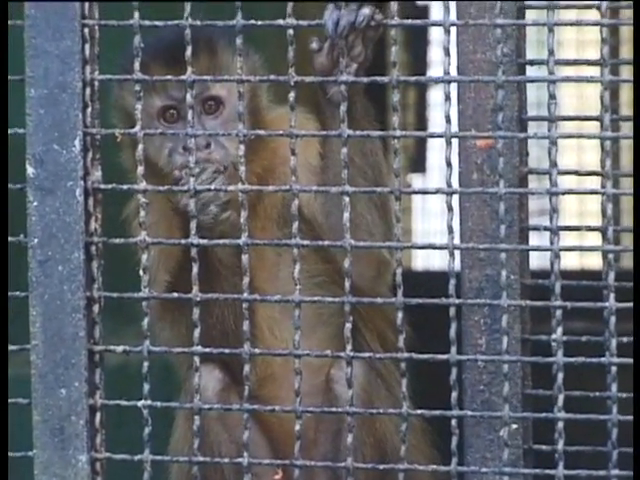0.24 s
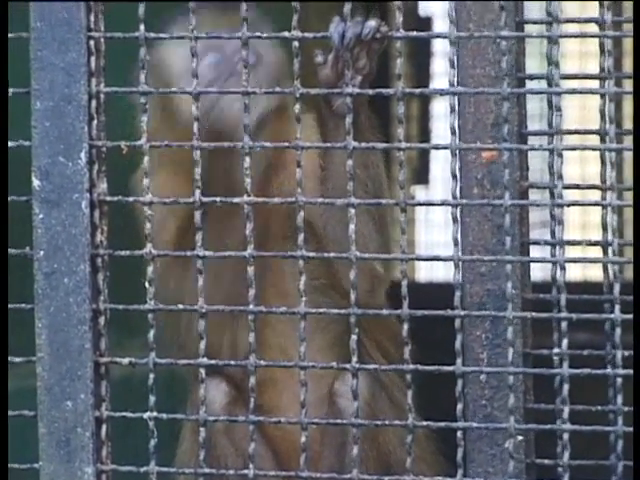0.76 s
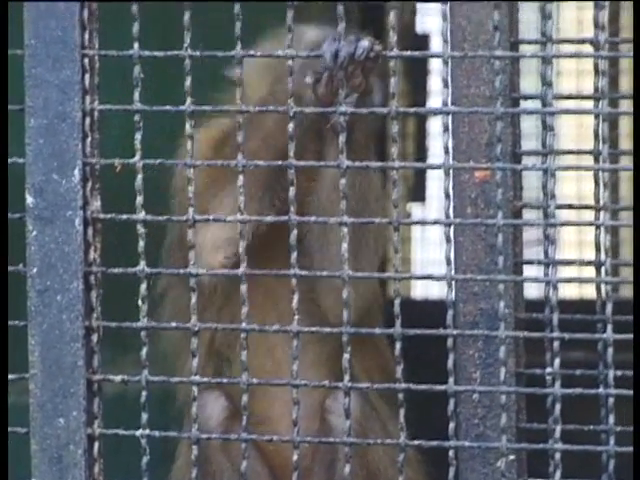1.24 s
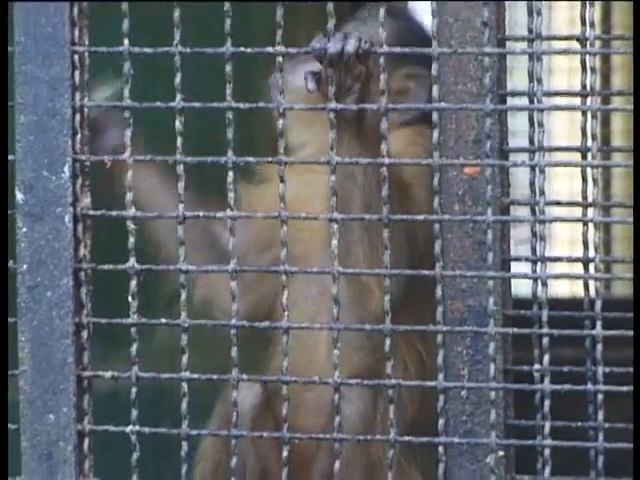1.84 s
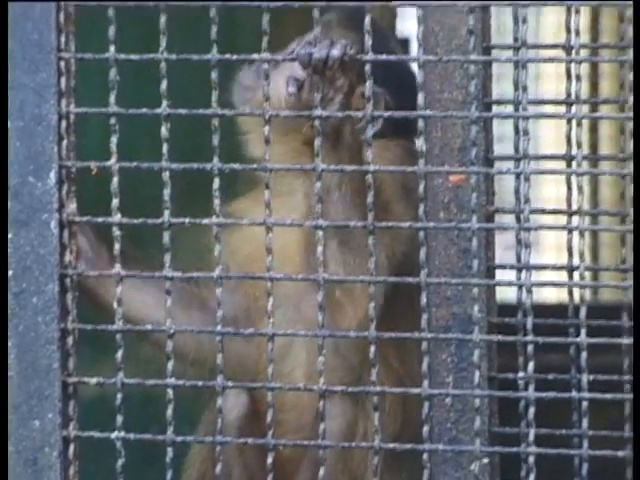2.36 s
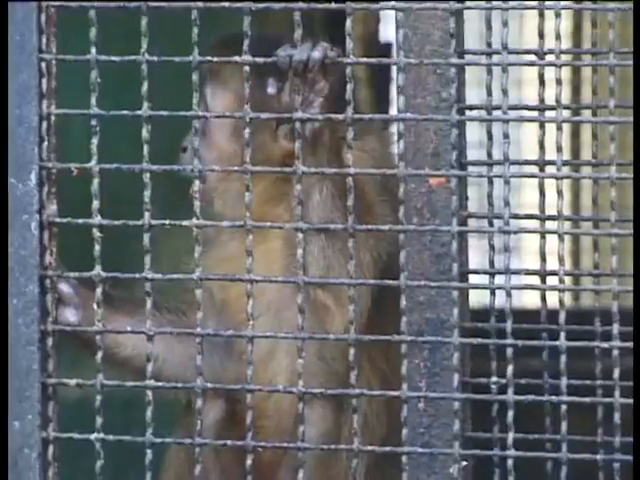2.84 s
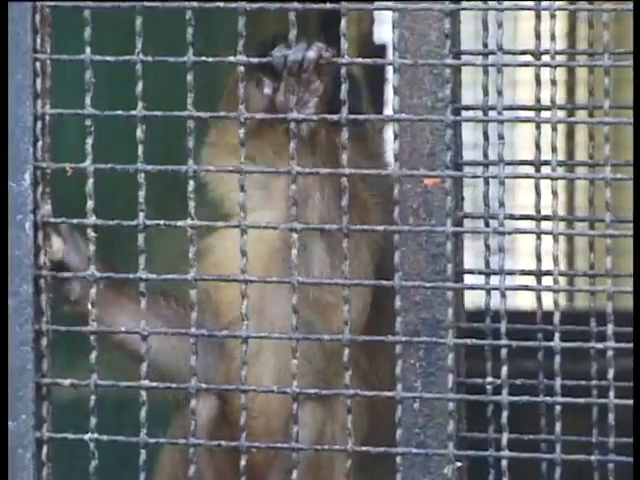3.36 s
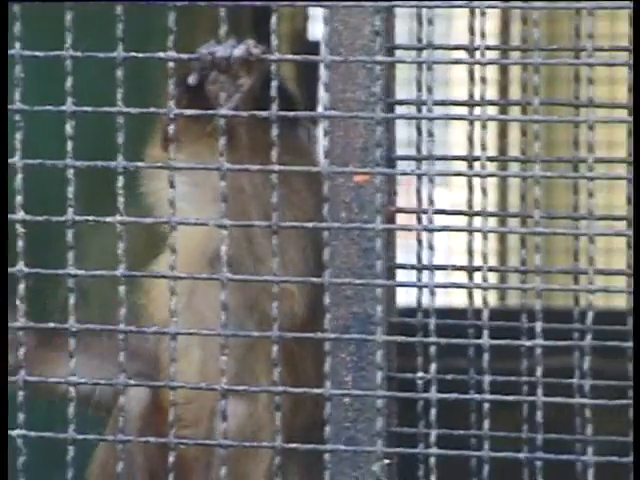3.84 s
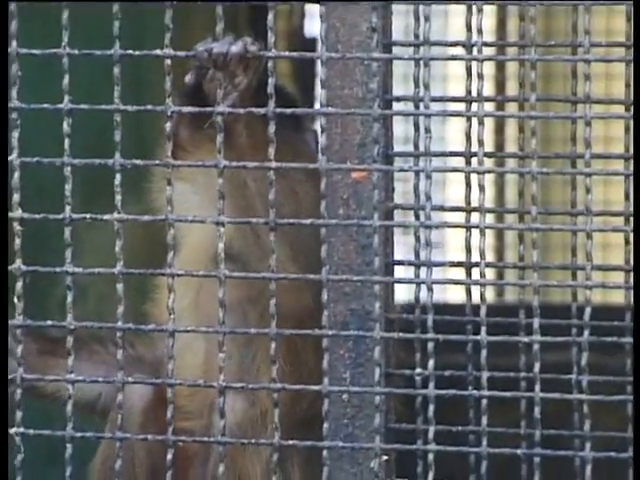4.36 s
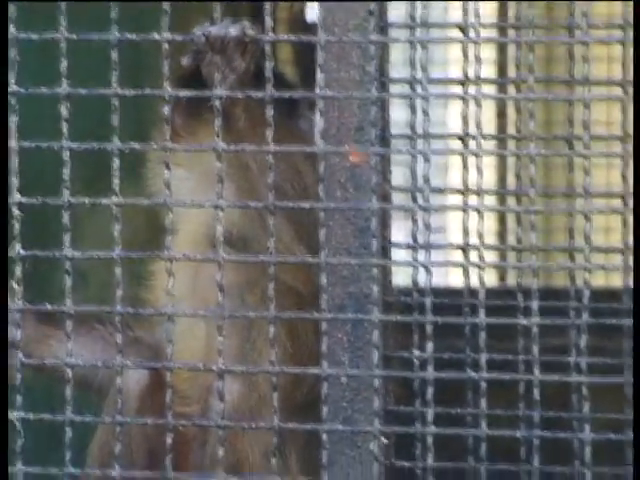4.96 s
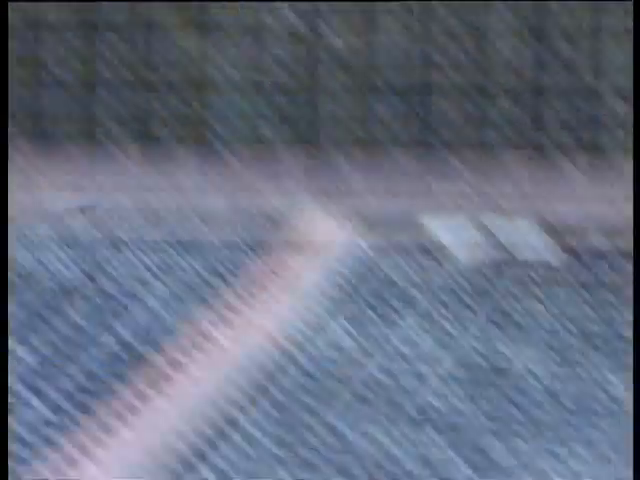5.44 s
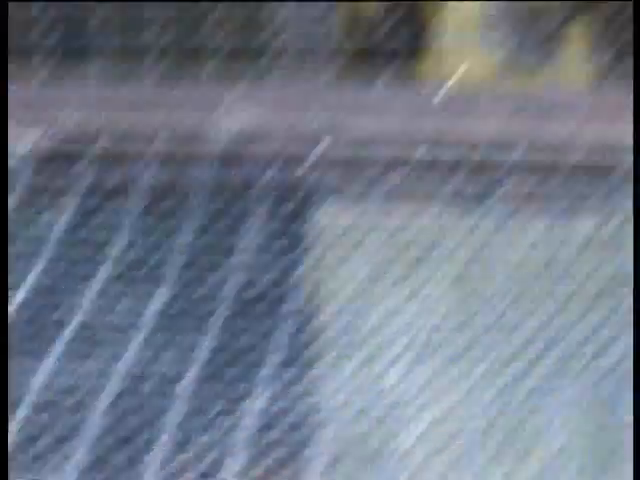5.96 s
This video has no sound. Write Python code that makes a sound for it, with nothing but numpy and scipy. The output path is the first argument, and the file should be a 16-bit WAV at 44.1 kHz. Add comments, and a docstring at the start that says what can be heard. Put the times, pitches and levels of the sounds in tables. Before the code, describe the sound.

Outdoors by a cage, a steady low traffic rumble lies under a soft hiss of leaves. Close by, slightly to the right, a monkey gives a string of short piercing whistles ending in a held note. Two grunts and a tiny bird chirp follow, then a longer, louder trill climbs and wavers, ending in a quick downward slide. Faint squeaks, rustles and grunts close it. A close stereo microphone catches a short hard echo after each call.

```python
"""Distant traffic rumbles under a soft hiss of leaves; then a caged monkey whistles trills, built of gliding
tones, with one long held note and a downward slide that ends the last long phrase. Monkeys nearby grunt and hoot
in harmonic tones, noise bursts make rustles and a low thump, and a far bird chirps in sine glides. The cage walls
answer every call with a noise tail. Two close microphone ports hear the callers from the right."""
import sys
import numpy as np
from scipy import signal
from scipy.fft import rfft, irfft, next_fast_len
from scipy.io import wavfile
from scipy.ndimage import uniform_filter1d, map_coordinates

SR = 44100
rng = np.random.default_rng(int(sys.argv[2]) if len(sys.argv) > 2 else 0)


def rack_gain(trim_db):
    """Turn a fader trim in dB into the linear factor to multiply a signal by."""
    fader = np.asarray(trim_db, float)
    return 10 ** (fader / 20)


def to_wav(s):
    """Save 16-bit WAV."""
    ch = np.atleast_2d(s).T  # columns
    pcm = np.round(np.clip(ch, -1, 1) * 32767)  # PCM
    wavfile.write(sys.argv[1], SR, pcm.astype(np.int16))


N = 273197


def unit(x):
    """Scaled to rms 1."""
    return x / np.sqrt(np.mean(x ** 2) + 1e-20)


def along(points, hz, count=1):
    """Column count of (frequency [Hz], value, ..) points, read on a log frequency axis."""
    p = np.transpose(points)
    return np.interp(np.log(hz + 1), np.log(p[0] + 1), p[count])


def wobble(rate):
    """A smooth random curve, rate knots a second."""
    return map_coordinates(rng.standard_normal(int(N * rate / SR) + 4), [np.arange(N) * rate / SR])


def filtered(x, response):
    """x passed through a complex response of frequency."""
    m = next_fast_len(x.shape[-1] + 8192)
    return irfft(rfft(x, m) * response(np.fft.rfftfreq(m, 1 / SR)), m)[..., :x.shape[-1]]


def add(track, s, sound):
    """Mix a sound into a track at time s, in seconds."""
    part = track[..., round(s * SR):][..., :sound.shape[-1]]
    part += sound[..., :part.shape[-1]]


def rush(spectrum, patchy_db, size=N):
    """Stereo noise of rms 1 with patches of random gain in time and frequency."""
    # how alike diffuse sound is at the two ports: (frequency [Hz], left-right correlation [-1 to 1])
    alike = [(40, 0.98), (100, 0.78), (300, 0.55), (1000, 0.69), (3000, 0.37), (8000, 0.034),
             (14000, 0.093)]
    z = signal.stft(rng.standard_normal((2, size)), nperseg=512)[2]
    field = uniform_filter1d(rng.standard_normal(z.shape[1:]), size=5, axis=0)
    field = uniform_filter1d(field, size=8, axis=1)
    pair = signal.istft(z * rack_gain(patchy_db * unit(field)), nperseg=512)[1][:, :size]

    def shares(hz):
        angle = np.arccos(np.clip(along(alike, hz), -1, 1)) / 2
        return spectrum(hz) * [np.cos(angle), np.sin(angle)]

    mid, side = filtered(pair, shares)
    return unit(np.array([mid + side, mid - side]))


def background():
    """Far traffic, a deep drone and a lumpier rumble of shaped noise, under a soft noise hiss of leaves."""
    # distant traffic: (time [s], drone level [dB], rumble level [dB])
    traffic = [(0, -36, -42), (.12, -33, -37), (.6, -33.5, -39), (.9, -37, -40), (1.4, -32, -36),
               (2, -33, -36.5), (2.3, -39, -37), (2.75, -35.5, -35.5), (3.15, -39.5, -37.5),
               (3.6, -32.5, -36), (3.97, -34, -37.5), (4.3, -39, -41), (4.7, -38, -42), (4.83, -44.5, -46),
               (5.05, -37, -39.5), (5.3, -37, -34.5), (5.9, -34, -37), (6.19, -38, -35.5)]
    # traffic spectrum: (frequency [Hz], relative level [dB per Hz])
    rumble_spectrum = [(13, -41), (22, -2), (119, -5), (225, -15), (257, -18), (336, -22.5), (372, -24),
                       (503, -30), (777, -38.5), (1200, -43.5), (1560, -64.5), (2640, -120)]
    # the rumble thumps or drops away for a moment: (time [s], change [dB], half length [s])
    lumps = [(0.276, -6, 0.036), (0.432, 5.5, .02), (0.577, 4.5, .02), (0.823, 13, 0.0083),
             (1.209, 11.5, 0.0067), (1.541, -13.5, 0.021), (2.155, -3.5, 0.037), (2.278, 7.5, 0.039),
             (3.03, -5.5, 0.039), (3.732, 5.5, 0.017), (3.84, -6.5, 0.054), (3.958, 7, .025),
             (4.105, 5.5, 0.018), (4.456, 8, 0.027), (5.16, -0.5, 0.014), (5.553, 5, .025),
             (5.662, -11.5, 0.013), (5.787, 6.5, 0.0067), (6.07, 7, 0.02)]
    # leaves: (time [s], hiss level [dB])
    leaves = [(0, -45), (1.1, -45.5), (1.4, -48), (2.2, -47), (3, -48), (3.45, -46.5), (4.1, -51.5),
              (5.6, -51), (6.19, -55.5)]
    # leaf spectrum: (frequency [Hz], relative level [dB per Hz])
    hiss_spectrum = [(290, -41), (500, -8), (780, -11.5), (875, -11.5), (2430, -12.5), (2680, -11),
                     (3620, -10), (3840, -13), (5740, -11.5), (13200, -28.5), (15400, -40)]
    s, drone_db, rumble_db = np.transpose(traffic)
    t = np.arange(N) / SR
    lumps_db = sum(db * np.exp(-((t - at) / half) ** 2) for at, db, half in lumps)

    def upper(hz):  # power share of the rumble above about 95 Hz; the drone has the rest
        return 1 / (1 + (95 / (hz + 1)) ** 4)

    def drone_shape(hz):
        return rack_gain(along(rumble_spectrum, hz)) * np.sqrt(1 - upper(hz)) / (1 + (33 / (hz + 1)) ** 4)

    drone = rush(drone_shape, patchy_db=0.9)
    rumble = rush(lambda hz: rack_gain(along(rumble_spectrum, hz)) * np.sqrt(upper(hz)), patchy_db=2.5)
    rumble = unit(rumble * rack_gain(1.37 * wobble(12)))
    low = rack_gain(np.interp(t, s, rumble_db) + lumps_db) * rumble
    low = low + rack_gain(np.interp(t, s, drone_db) + 0.94 * lumps_db) * drone
    # the hiss takes along a share of each drop
    hiss_db = np.interp(t, *np.transpose(leaves)) + 0.39 * np.minimum(lumps_db, 0) + 0.82 * wobble(16)
    return low + rack_gain(hiss_db) * rush(lambda hz: rack_gain(along(hiss_spectrum, hz)), patchy_db=0.56)


def voice(t, length, hz, partials_db, hook, sag, close, rough=0):
    """A voiced note: vocal folds bend the pitch as they start (hook) and slacken as they close (sag)."""
    left = length - t
    bend = 1 + hook * np.exp(-t / 0.002) - sag * np.exp(np.minimum(-left, 0.004) / close)
    # rough notes lose their regular cycle as they go on: timing wanders and each partial breaks up
    knots = rng.standard_normal((len(partials_db) + 1, 128))
    growth = rough * np.clip(t / length, 0, 1)
    scatter = [growth * map_coordinates(row, [t * 230]) for row in knots]
    phase = 2 * np.pi * np.cumsum(hz * bend) / SR + 0.55 * scatter[-1]
    opening = np.clip(t / 0.0014, 0, 1)
    closing = np.clip(1 + left / 0.005, 0, 1) ** 1.62
    partials = sum(rack_gain(db + 9.8 * scatter[k]) * np.sin((k + 1) * phase)
                   for k, db in enumerate(partials_db))
    return np.sqrt(2) * opening * closing * partials


def room(x, wet_db):
    """Direct sound plus the cage walls' noise tail, each frequency dying at its own speed."""
    # decay between the walls: (frequency [Hz], time to fall 60 dB [s])
    walls = [(500, 0.36), (3000, 0.39), (7000, 0.32), (12000, 0.28)]
    hz, t, z = signal.stft(rng.standard_normal((2, SR // 2)), SR, nperseg=256)
    tail = signal.istft(z * rack_gain(-60 * t / along(walls, hz)[:, None]), SR, nperseg=256)[1]
    onset = np.clip(np.arange(tail.shape[1]) / SR / 0.0011, 0, 1)
    tail = tail * onset + 0.25 * tail[0]  # the left tail is partly shared by both sides
    wet = rack_gain(wet_db) * signal.fftconvolve(x[None], tail / np.linalg.norm(tail[0]), axes=1)
    wet[:, :len(x)] += x
    return wet


def whistle_overtones(hz, octave_db):
    """Partial levels of a nearly pure tone: the purer the octave, the fainter the twelfth."""
    # how well the mouth passes the whistle's twelfth: (frequency [Hz], gain [dB])
    twelfth = [(8000, -24), (9000, -32), (9800, -11), (10500, -21), (11500, -21), (13000, -30)]
    return [0 * octave_db, octave_db, 1.3 * octave_db + along(twelfth, 3 * hz)]


def whistle(curve, hook, wet_db):
    """A whistle steered along its pitch, level and overtone curve, with the walls' answer."""
    s, *cols = np.transpose(curve)
    t = np.arange(round((s[-1] - s[0]) * SR)) / SR
    hz, db, octave_db = [np.interp(t + s[0], s, c) for c in cols]
    overtones_db = whistle_overtones(hz, octave_db)
    tone = voice(t, t[-1] - 0.005, hz, overtones_db, hook, sag=0.01, close=0.0014, rough=0.076)
    return room(rack_gain(db) * tone, wet_db)


def monkey():
    """Trills of short whistles, each leaning toward the next, a held whistle and a downward slide."""
    # trill notes: (time [s], length [s], middle pitch [Hz], level [dB], octave overtone once settled [dB])
    trill = [(.405, .028, 2797, -36.5, 6), (0.48, 0.0148, 3030, -34.5, 7), (.553, 0.0188, 3090, -29.5, 5),
             (0.63, 0.0188, 3140, -31, -1), (0.702, .025, 3192, -31, -1.5), (.836, .035, 3328, -39, -1),
             (0.883, 0.017, 3274, -41, -0.5), (.934, .029, 3316, -30.5, -6),
             (1.001, .027, 3322, -25.5, -10), (1.068, .028, 3320, -24.5, -8.5),
             (1.138, .026, 3340, -25, -10), (1.19, 0.03, 3353, -27, -10), (2.08, 0.0302, 2958, -37, 3.3),
             (2.161, 0.0163, 3135, -31.5, 5), (2.237, .017, 3240, -29, 1), (2.308, .023, 3325, -28.5, -2.9),
             (2.384, 0.024, 3347, -27, -4), (2.461, 0.0262, 3387, -28.5, -2.5),
             (2.54, 0.0197, 3425, -22, -7.5), (2.615, 0.0189, 3510, -20.5, -9.5),
             (2.686, 0.019, 3494, -20, -10.5), (2.758, .017, 3594, -18.5, -13.5),
             (2.831, 0.013, 3645, -20, -18.5), (2.902, 0.0184, 3825, -23.5, -19),
             (2.976, .018, 3597, -21.5, -19), (3.053, 0.021, 3338, -33.5, -17),
             (3.184, 0.054, 3334, -29.5, -13.5), (3.275, 0.017, 3690, -21.5, -25),
             (3.362, 0.0134, 4130, -22.5, -24), (3.44, 0.019, 4164, -22.5, -22),
             (3.517, 0.018, 4040, -20.5, -24.5), (3.601, 0.0096, 3670, -22, -21),
             (3.767, .047, 3400, -29, -7), (3.856, .016, 3635, -19.5, -14.5),
             (3.935, .016, 3896, -18.5, -23), (4.015, 0.014, 3967, -21.5, -32),
             (4.109, 0.013, 3310, -41.5, -13), (4.503, 0.016, 4198, -28.5, -3.5),
             (4.598, 0.018, 4326, -27.5, -2.5), (4.677, 0.019, 4260, -22, -9.5),
             (4.769, .011, 4094, -23, -6.5), (4.853, 0.012, 4145, -22, -5.5),
             (5.285, 0.015, 3203, -34.5, -2)]
    # the held note: (time [s], pitch [Hz], level [dB], octave overtone [dB])
    held = [(1.25, 3460, -36, -21), (1.262, 3335, -31.5, -8), (1.295, 3331, -23, -15.5),
            (1.43, 3358, -28.5, -16), (1.484, 3343, -21.5, -16.5), (1.514, 3338, -30, -12),
            (1.562, 3328, -27, -15), (1.599, 3304, -37.5, -18), (1.642, 3150, -42, -11)]
    # the downward slide that ends the last long phrase:
    # (time [s], pitch [Hz], level [dB], octave overtone [dB])
    slide = [(4.939, 3780, -26, -13), (4.952, 3516, -34, -6.5), (4.968, 3010, -46.5, -7)]
    phrase_gap_s, long_s = 0.15, 0.038
    lean = 0.26  # share of the step to the phrase's next note that a note already glides
    long_rise_hz = 50  # long notes climb this much more
    swell_db_per_s = 68  # breath pressure builds through a note
    overtone_lag_s = 0.0021  # the overtones join once the note has settled
    out = np.zeros((2, N))
    starts, pitches = np.transpose(trill)[[0, 2]]
    steps = np.append(np.diff(pitches) * (np.diff(starts) < phrase_gap_s), 0)
    for (s, length, mid_hz, db, octave_db), step in zip(trill, steps):
        t = np.arange(round((length + 0.005) * SR)) / SR
        short = length < long_s
        glide_hz = lean * step + long_rise_hz * (not short)
        hz = mid_hz + glide_hz * (t / length - 0.5)
        swell = rack_gain(db + swell_db_per_s * (t - length / 2))
        swell = swell * np.clip(short + t / 0.014, 0, 1)  # long notes open softly
        # long, faint, lowest and top notes start level
        hook = 0.1 * short * np.interp(mid_hz, [3000, 3100, 3690, 4020], [0, 1, 1, 0])
        hook = hook * np.clip((db + 41) / 7, 0, 1)
        sag = 0.02 * short * np.clip((db + 44.5) / 12, 0, 1)
        overtones_db = whistle_overtones(hz, octave_db - 12 * np.exp(-t / overtone_lag_s))
        note = voice(t, length, hz, overtones_db, hook, sag, close=0.0026, rough=0.12)
        add(out, s, room(swell * note, wet_db=-6.5))
    add(out, held[0][0], whistle(held, hook=0.054, wet_db=-7.5))
    add(out, slide[0][0], whistle(slide, hook=0.05, wet_db=-7.0))
    return out


def rustles():
    """Rustles, a low thump and a faint narrow 1.3 kHz breath: uneven noise bursts around a centre frequency."""
    # bursts: (time [s], rise [s], fall [s], level [dB], centre [Hz], width [octaves])
    bursts = [(0.771, 0.011, 0.021, -37, 3500, 0.84), (2.3, 0.029, 0.069, -58, 3000, 1.1),
              (2.8, .06, .08, -52, 1770, 0.84), (3.359, .05, 0.34, -45, 6300, 0.4),
              (3.859, 0.048, 0.12, -46, 6000, 0.42), (3.95, 0.014, 0.025, -29, 197, 0.6),
              (5.313, 0.0088, 0.024, -39, 3120, 0.82), (5.312, 0.06, 0.11, -54.5, 1280, 0.098),
              (5.54, .04, 0.074, -47.5, 7000, 0.41), (5.668, 0.0035, 0.0057, -46.5, 2500, 0.92),
              (6.129, 0.0081, 0.026, -48.5, 1980, 0.95), (6.16, 0.027, .05, -52, 6000, 0.46)]
    out = np.zeros((2, N))
    for s, rise, fall, db, centre_hz, octaves in bursts:
        t = np.arange(round((2 * rise + 4 * fall) * SR) + 600) / SR - 2 * rise
        shape = np.where(t < 0, np.exp(-(t / rise) ** 2), np.exp(-t / fall))
        band = lambda hz: np.exp(-0.5 * (np.log2((hz + 1) / centre_hz) / octaves) ** 2)
        add(out, s - 2 * rise, rack_gain(db) * shape * rush(band, patchy_db=3.5, size=len(t)))
    return out


def grunts():
    """Harmonic grunts coloured by the throat, with more of the walls from afar, each with a hoarse puff."""
    # grunts: (time [s], length [s], pitch [Hz], level [dB], distance [0-1], roughness [0-1])
    calls = [(1.712, 0.029, 756, -41.5, 0, 0.3), (1.945, 0.034, 795.5, -35, 0.04, 0.1),
             (5.807, 0.037, 761, -45, 0.52, .6), (5.979, 0.058, 795, -50.5, 0.5, 0.4),
             (6.167, 0.029, 801, -46, 0.5, 0)]
    # throat colour, one row a grunt: (levels of partials 1 to 7 [dB])
    throats = [(3, 2.3, -1, -13, -11, -3.5, -23), (-2, -9, -10, -14, -7.5, -23, -29),
               (-13, 2.5, -1.5, -3, -1, -15, -14), (-6, 1, -8, -18, -4, -11, -22),
               (-12, 0, -16, -14, -1, -18, -24)]
    out = np.zeros((2, N))
    for (s, length, hz, db, far, rough), colour_db in zip(calls, throats):
        t = np.arange(round((length + 0.005) * SR)) / SR
        grunt = voice(t, length, hz, colour_db, hook=-0.023, sag=0.069, close=0.0048, rough=rough)
        add(out, s, rack_gain(db) * room(grunt, wet_db=-7.5 + 16.2 * far))
        # the voice ends in a hoarse puff
        fade = np.arange(round(0.07 * SR)) / SR
        puff_hz, octaves = hz * (0.9 + 1.6 * far), 0.8 + 0.4 * far
        band = lambda f: np.exp(-0.5 * (np.log2((f + 1) / puff_hz) / octaves) ** 2)
        husk = rush(band, patchy_db=2.5, size=len(fade))
        shape = fade / 0.0062 * np.exp(1 - fade / 0.0066 / (1 + rough))
        add(out, s + length * (1 - 0.6 * rough), rack_gain(db - 2.5 - 3.1 * far) * husk * shape)
    return out


def bird():
    """A far bird's faint chirps: gliding sines with more of the walls' answer than direct sound."""
    # chirps: (time [s], length [s], first pitch [Hz], last pitch [Hz], level [dB])
    chirps = [(2.087, .026, 4060, 7650, -43), (2.119, 0.05, 6300, 4180, -44.5),
              (2.156, 0.018, 7360, 6000, -50)]
    out = np.zeros((2, N))
    for s, length, first_hz, last_hz, db in chirps:
        t = np.arange(round(length * SR)) / SR
        phase = 2 * np.pi * np.cumsum(first_hz + (last_hz - first_hz) * t / length) / SR
        chirp = np.sin(np.pi * t / length) * np.sin(phase)
        add(out, s, room(rack_gain(db) * chirp, wet_db=2.5))
    return out


def hoots():
    """Thin hoots and squeaks of three partials, most of them sitting on their octave, gliding in pitch."""
    # hoots: (time [s], length [s], first pitch [Hz], last pitch [Hz], octave level [dB],
    #         ground tone against the octave [dB])
    calls = [(5.283, 0.0099, 2030, 1960, -40, -30), (5.303, 0.014, 1805, 2070, -37.5, -32),
             (5.316, 0.0041, 1800, 1960, -38, -27), (5.755, 0.016, 2136, 2127, -36.5, -21),
             (5.943, 0.065, 1960, 2050, -55.5, 4.5)]
    out = np.zeros((2, N))
    for s, length, first_hz, last_hz, db, ground_db in calls:
        t = np.arange(round((length + 0.005) * SR)) / SR
        hz = last_hz + (first_hz - last_hz) * np.exp(-t / 0.0112)
        partials_db = [ground_db, 0, ground_db / 3 - 3.0]
        hoot = voice(t, length, hz, partials_db, hook=0, sag=0.013, close=0.0018, rough=12 * length)
        add(out, s, rack_gain(db) * room(hoot, wet_db=-9.5))
    return out


def ports(x, points):
    """The two close microphone ports split level and phase by frequency, half to each side."""
    side = np.array([[0.5], [-0.5]])
    return filtered(x, lambda hz: rack_gain(side * along(points, hz))
                    * np.exp(1j * side * along(points, hz, count=2)))


def scene():
    """Callers from one side; rustles and background from all around."""
    # left port against right for diffuse sound: (frequency [Hz], level [dB], phase [radians])
    around = [(39.7, 0, 0.2), (129, -3, -0.13), (300, -5.5, -0.3), (700, -0.8, 0), (1500, 1.1, 0.67),
              (3500, 1, -2), (7000, 1.5, -2), (14000, 1, -3)]
    # left port against right for the callers: (frequency [Hz], level [dB], phase [radians])
    from_right = [(60, -1, 0), (250, -4, 0), (1000, 0, -.1), (2700, -3, -1), (3100, -10, -1),
                  (3400, -5, -.6), (3750, -4, -.8), (4100, .1, -1.3), (5600, -5, -1.7), (6300, -1.1, -1.9),
                  (6800, -5, -2.3), (8300, -5, -2.1), (10000, -3, -3), (15000, .1, -4)]
    diffuse = ports(background() + rustles(), around)
    callers = ports(monkey() + grunts() + bird() + hoots(), from_right)
    return callers + diffuse


def low_pass(x):
    """Removes everything above the highest recorded frequency."""
    return signal.sosfilt(signal.butter(12, 15600, fs=SR, output="sos"), x)


def record(dry):
    """The microphone channel's band ends steeply at the top."""
    top_hz = 15400
    mix = filtered(dry, lambda hz: 1 / (1 + (hz / top_hz) ** 60))
    return low_pass(mix)


dry = scene()
out = record(dry)
to_wav(out)
```